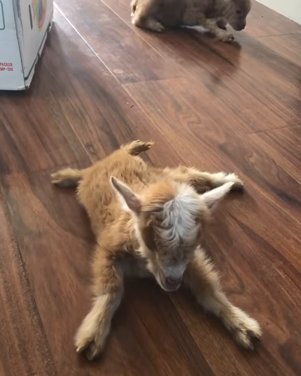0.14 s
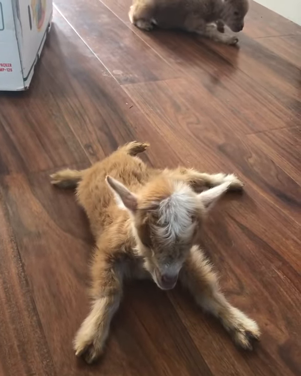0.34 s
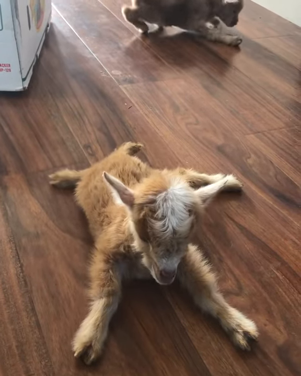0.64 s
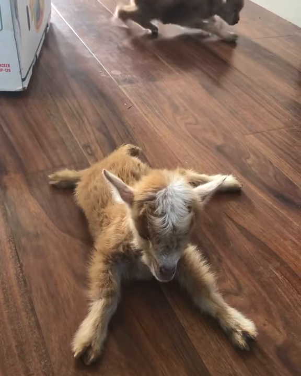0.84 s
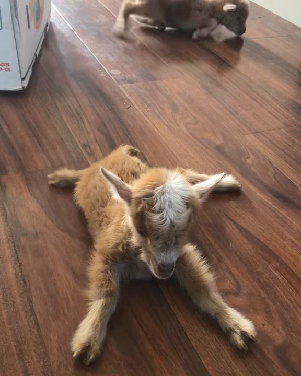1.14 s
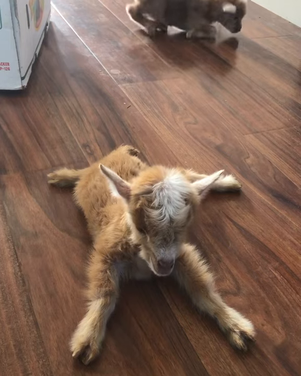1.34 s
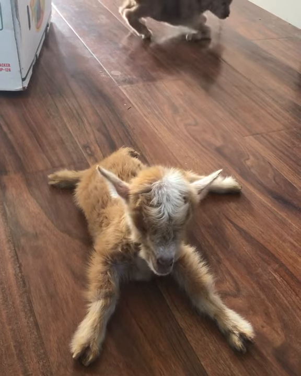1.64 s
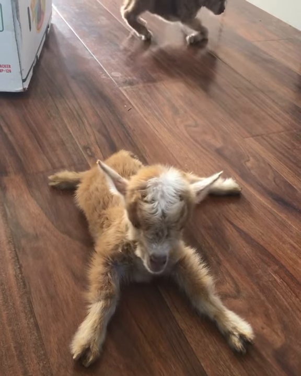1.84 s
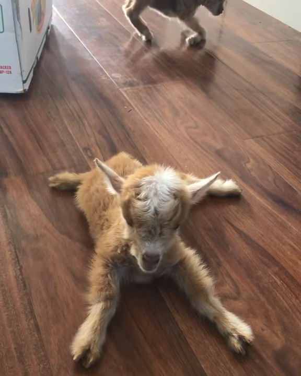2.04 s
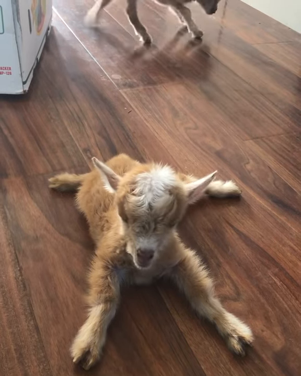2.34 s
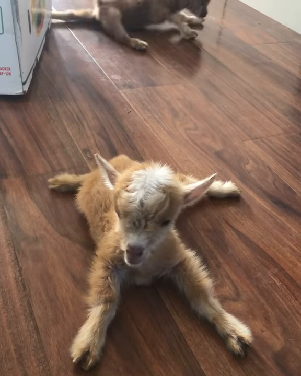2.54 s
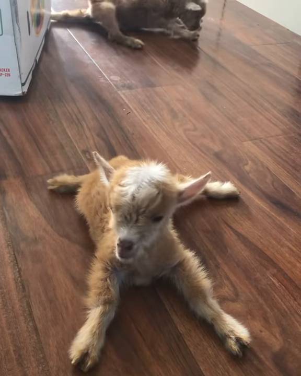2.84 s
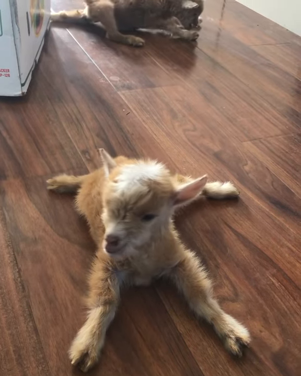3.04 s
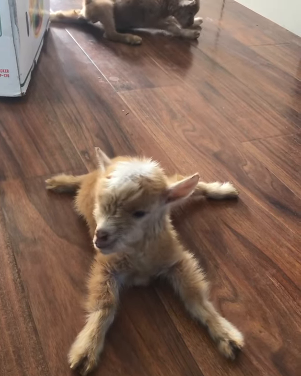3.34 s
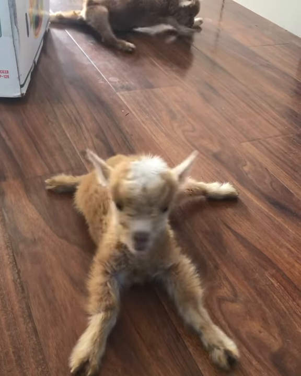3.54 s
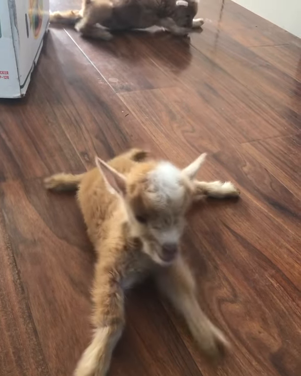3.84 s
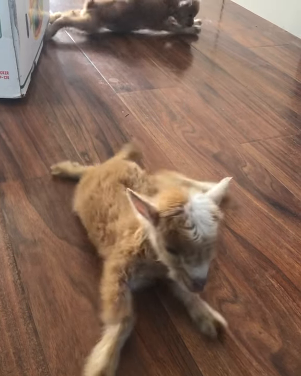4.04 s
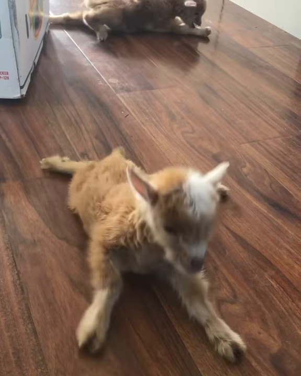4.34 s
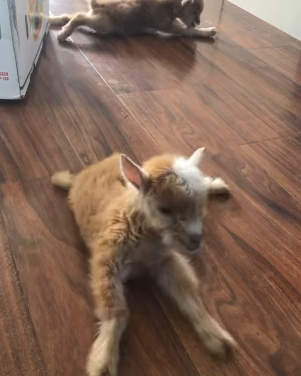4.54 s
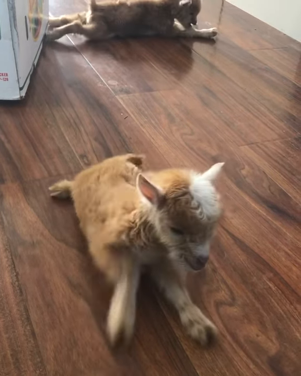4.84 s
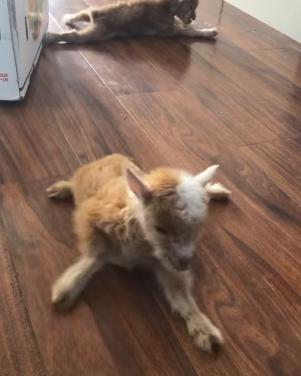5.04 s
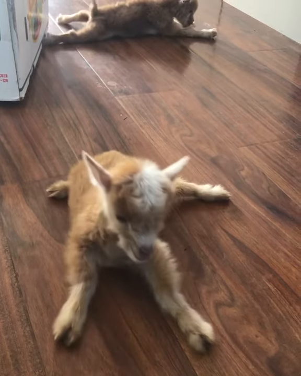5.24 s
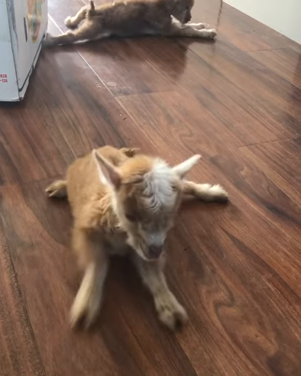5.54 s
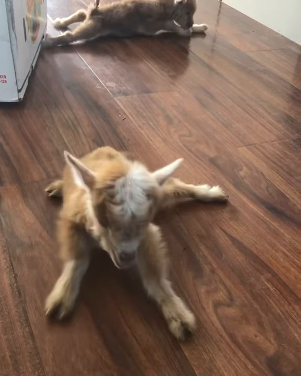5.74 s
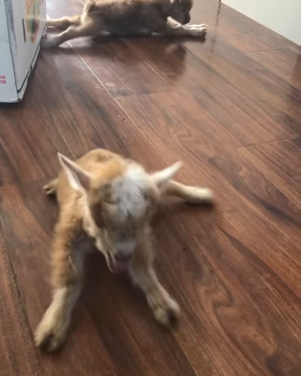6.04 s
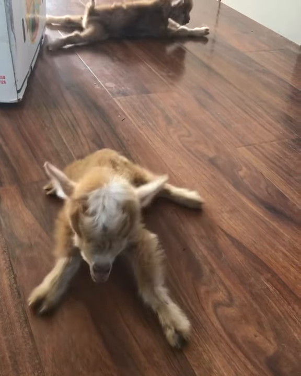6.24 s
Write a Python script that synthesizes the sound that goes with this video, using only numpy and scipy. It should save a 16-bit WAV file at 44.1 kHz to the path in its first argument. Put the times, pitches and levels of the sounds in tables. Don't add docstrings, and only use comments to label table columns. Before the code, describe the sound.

In a quiet, hard-walled room, a young goat slips with a thud, bleats four times across the floor, and a closer kid answers with a cracking squeak.

```python
import sys
import numpy as np
from scipy import signal
from scipy.fft import rfft, irfft, next_fast_len
from scipy.io import wavfile
from scipy.ndimage import uniform_filter1d

SR = 44100
rng = np.random.default_rng(int(sys.argv[2]) if len(sys.argv) > 2 else 0)


def materialize(psi):
    bounded = np.clip(np.atleast_2d(psi).T, -1, 1)
    quanta = np.round(bounded * 32767).astype(np.int16)
    wavfile.write(sys.argv[1], SR, quanta)


def amplitude_ratio(level_db):
    exponent = np.asarray(level_db, float) / 20
    return 10 ** exponent


N = 281358


def rms_one(x):
    return x / np.sqrt(np.mean(x ** 2) + 1e-20)


def at_hz(points, hz):
    point_hz, value = np.array(points).T
    return np.interp(np.log(hz), np.log(point_hz), value)


def band(x, low_hz, high_hz):
    edges_hz = [low_hz, min(high_hz, 0.45 * SR)]
    return signal.sosfilt(signal.butter(2, edges_hz, "band", fs=SR, output="sos"), x)


def drift(rate_hz, size):
    r = np.exp(-2 * np.pi * rate_hz / SR)
    white = rng.standard_normal(size + 4000)
    return rms_one(signal.lfilter([1], [1, -2 * r, r * r], white)[4000:])


def add(out, s, piece):
    i = round(s * SR)
    out[i:i + len(piece)] += piece[:N - i]


def house():
    # frequency in Hz, density in dB per Hz.
    hum_spectrum = [(26, -27), (45, -3.5), (123, -11.5), (157, 1.5), (319, -12), (449, -12.5), (533, -16),
                    (788, -22), (869, -21.5), (1950, -31), (2310, -35.5), (2880, -34), (8050, -44),
                    (12200, -46.5), (15600, -44)]
    # frequency in Hz, rms level in dB.
    whine = [(2013, -89), (2859, -87.5), (3435, -99), (3494, -90.5), (5685, -93.5), (11768, -92)]
    hum_db, high_whine_stops_s = -57, 3.5

    size = next_fast_len(N)
    hz = np.maximum(np.arange(size // 2 + 1) * SR / size, 1)
    hum = irfft(rfft(rng.standard_normal(size)) * amplitude_ratio(at_hz(hum_spectrum, hz)), size)[:N]
    out = amplitude_ratio(hum_db) * rms_one(hum)

    t = np.arange(N) / SR
    for tone_hz, level_db in whine:
        running = (tone_hz < 9000) | (t < high_whine_stops_s)
        waver = amplitude_ratio(level_db + 3 + 1.4 * drift(19, N))
        out += waver * np.sin(2 * np.pi * tone_hz * t) * running
    return out


def room(x):
    # frequency in Hz, time to fall 60 dB in seconds.
    room_t60 = [(100, 0.35), (500, 0.53), (1500, 0.53), (3000, 0.43), (6000, 0.44), (12000, 0.35)]
    t = np.arange(SR) / SR
    edges_hz = 60 * 2 ** np.arange(0, 8.5, 0.5)
    white = rng.standard_normal((2, SR))
    tail = np.zeros(SR)
    for k, (low, high) in enumerate(zip(edges_hz, edges_hz[1:])):
        t60 = at_hz(room_t60, np.sqrt(low * high))
        tail += band(white[k % 2], low, high) * amplitude_ratio(-60 * t / t60)
    tail *= np.clip((t - 0.004) / 0.0025, 0, 1)
    return signal.fftconvolve(x, tail / np.sqrt(np.sum(tail ** 2)))[:N]


def hoof_and_fur_slides():
    # start in seconds, length in seconds, scuff in dB, fur rustle in dB.
    strokes = [(0.002, .22, -80, -75.5), (.62, 0.095, -77, -80), (.8, 0.13, -72.5, -80),
               (0.898, 0.14, -69.5, -76), (1.038, 0.072, -65, -76), (1.095, 0.28, -71.5, -78),
               (1.368, .09, -81, -85), (1.53, 0.21, -82, -86), (2.14, .2, -75, -79),
               (2.3, 0.24, -70, -80.5), (2.546, .12, -76, -83), (2.678, .2, -82, -83),
               (3.29, .14, -77, -82), (3.412, .09, -77, -79), (3.5, 2.85, -82, -77.5),
               (3.89, .07, -68, -65), (3.997, 0.073, -62, -67), (4.616, .06, -74, -68),
               (4.67, 0.068, -76, -74), (5.12, 0.18, -70, -80), (5.33, 0.08, -78, -79),
               (5.42, .09, -74, -73), (5.56, 0.082, -76, -66), (6.22, 0.17, -71, -81)]
    scuff = np.full(N, amplitude_ratio(-87))
    fur = np.full(N, amplitude_ratio(-98))
    for s, length, scuff_db, fur_db in strokes:
        swell = np.hanning(round(length * SR)) ** 0.4
        add(scuff, s, amplitude_ratio(scuff_db) * swell)
        add(fur, s, amplitude_ratio(fur_db) * swell)
    grains = rng.standard_normal((2, N)) * amplitude_ratio(1.4 * drift(60, N))
    horn_noise = rms_one(band(grains[0], 1730, 5930))
    fur_noise = rms_one(band(grains[1], 8500, 17500))
    return scuff * horn_noise + fur * fur_noise


def noise_click(low_hz, high_hz, t60):
    t = np.arange(round(0.3 * SR)) / SR
    return rms_one(band(rng.standard_normal(len(t)), low_hz, high_hz)) * amplitude_ratio(-60 * t / t60)


def board_knocks():
    # start in seconds, peak in dB, board pitch in Hz, tick in dB, joists in dB.
    blows = [(0.979, -45.5, 169, -58, -65), (0.994, -43, 217, -67, -40.5), (1.062, -39, 120, -50.5, -45),
             (1.205, -43, 388, -73, -52), (1.299, -46.5, 169, -47.5, -72), (2.352, -44, 208, -51.5, -51),
             (2.566, -27.5, 124, -54, -37.5), (3.934, -46, 170, -66.5, -77), (3.986, -47.5, 630, -49, -70),
             (4.014, -41.5, 274, -60, -50), (4.383, -44.5, 150, -44, -73.5)]
    out = np.zeros(N)
    t = np.arange(round(0.3 * SR)) / SR
    for s, peak_db, hz, tick_db, joist_db in blows:
        t60 = 0.059 * (hz / 150) ** 0.29
        white = rng.standard_normal(len(t))
        sweep = 2 * np.pi * (hz * t + 3.46 * (1 - np.exp(-t / 0.0036)))
        ring = np.sin(sweep) * amplitude_ratio(-60 * t / t60) * (1 - np.exp(-t / 0.0014))
        rattle = rms_one(band(band(white, hz, 1260), 60, 1400)) * amplitude_ratio(-60 * t / (1.08 * t60))
        joists = rms_one(band(white[::-1], 75, 148)) * amplitude_ratio(-60 * t / 0.27)
        joists *= 1 - np.exp(-t / 0.0064)
        tick = rms_one(band(white, 3000, 6500)) * amplitude_ratio(-60 * t / 0.013)
        body = ring + 0.3 * rattle
        add(out, s, amplitude_ratio(peak_db - 1.5) * body + amplitude_ratio(tick_db - 3.5) * tick + amplitude_ratio(joist_db) * joists)
    return out


def hoof_ticks():
    # start in seconds, peak in dB, pitch in Hz.
    taps = [(0.1194, -64, 2810), (0.6494, -64, 3950), (0.874, -53, 4240), (0.9073, -60, 3330),
            (0.9557, -56, 4910), (1.1344, -58, 4590), (1.1767, -57, 4000), (2.353, -50, 3300),
            (2.47, -56.5, 2930), (3.9201, -46, 2780), (4.024, -55, 3960), (4.6436, -47, 5670),
            (5.725, -55, 2860), (6.325, -47, 2970)]
    out = np.zeros(N)
    for s, peak_db, hz in taps:
        add(out, s, amplitude_ratio(peak_db - 5) * noise_click(0.91 * hz, 1.15 * hz, t60=0.034))
    return out


def dry_snaps():
    # start in seconds, peak in dB.
    snaps = [
        (3.447, -60),
        (4.683, -57),
        (5.399, -51.5),
        (5.437, -57),
    ]
    out = np.zeros(N)
    for s, peak_db in snaps:
        add(out, s, amplitude_ratio(peak_db) * noise_click(2900, 16500, t60=0.027))
    return out


def puffs(table, nose, mouth):
    out = np.zeros(N)
    for s, length, level_db in table:
        white = rng.standard_normal(round(0.25 * SR))[:round(length * SR)]
        puff = band(white, 1900, 4400)
        puff += nose * band(white, 4340, 5900)
        puff += mouth * band(white, 9100, 16600)
        add(out, s, amplitude_ratio(level_db) * rms_one(puff) * np.hanning(len(puff)))
    return out


def bleat(tables, throat, mouth_sets, push, jitter, breath_db, fade_s):
    out = np.zeros(N)
    number = np.arange(1, 27)[:, None]
    no_lift_db, lift_per_db = push

    def soft(v):
        return uniform_filter1d(v, size=353, mode="nearest")

    for rows in tables:
        s, *columns = np.transpose(rows)
        t = np.arange(s[0], s[-1], 1 / SR)

        def wander(rate_hz):
            return drift(rate_hz, size=24000)[:len(t)]

        pitch, effort_db, mouth, tongue_hz = [soft(np.interp(t, s, c)) for c in columns]
        tilt, depth, nose_db = [shut + mouth * (wide - shut) for shut, wide in mouth_sets.values()]
        pitch = pitch * (1 + jitter * wander(28))
        phase = 2 * np.pi * np.cumsum(pitch) / SR
        hz = number * pitch

        gains = amplitude_ratio(depth * at_hz(throat, hz) + tilt * np.log2(hz / 2800)) * (hz < 17000)
        lift_db = lift_per_db * (effort_db - no_lift_db)
        gains *= amplitude_ratio(lift_db * np.exp(-(np.log2(hz / 2860) / 0.32) ** 2))
        gains *= amplitude_ratio(7 * np.exp(-(np.log2(hz / tongue_hz) / 0.11) ** 2))
        head = np.clip((pitch - 1750) / (2330 - 1750), 0, 1)
        gains *= amplitude_ratio(-11 * head * (number % 2 == 0))
        gains *= amplitude_ratio(-5 * np.clip(1.19 - mouth, 0, 1) * np.clip(number - 10, 0, 5))
        gains *= amplitude_ratio(1.37 * number ** 0.34 * np.array([wander(27) for _ in hz]))
        upper = np.sqrt(np.sum(gains[1:] ** 2, axis=0))
        gains[0] = np.hypot(gains[0], amplitude_ratio(nose_db) * upper)
        gains /= np.sqrt(np.sum(gains ** 2, axis=0) / 2)

        lag = rng.normal(0, 0.49, (26, 1))
        tone = np.sum(gains * np.sin(number * phase + lag), axis=0)
        air = tone * wander(167)
        edge = np.clip(np.minimum(t - s[0], s[-1] - t) / fade_s, 0, 1)
        add(out, s[0], edge * amplitude_ratio(effort_db) * (tone + amplitude_ratio(breath_db) * air))
    return out


def near_kid():
    # frequency in Hz, gain in dB.
    throat = [(1200, -51.5), (2000, -0.5), (2700, -1), (4000, -18.5), (5300, -10.5), (6600, -11),
              (7900, -12.5), (9300, -14.5), (12000, -19.5), (15500, -34)]
    # tilt in dB per octave, throat depth, nasal hum in dB relative to the upper harmonics.
    mouth_sets = dict(tilt_db=(-16.5, -0.13), depth=(1, 0.94), nose_db=(26.5, -61))
    push = (-40, 0.028)
    # time in seconds, pitch in Hz, effort in dB, mouth opening (0 shut, 1 wide),
    # tongue resonance in Hz.
    creak = [(5.556, 1475, -56, 0.4, 2900), (5.566, 1272, -59.5, 0.28, 7700),
             (5.588, 1465, -52.5, 0.22, 10100), (5.605, 1486, -50, .33, 10600),
             (5.613, 1570, -49, .4, 9400)]
    whistle = [(5.614, 1680, -48, 0.37, 8600), (5.641, 2140, -49, 1, 8650), (5.656, 2350, -52, 0.9, 7100),
               (5.672, 2150, -62, 0.87, 8600), (5.709, 1877, -54, 0.54, 7600),
               (5.732, 1960, -47, 0.95, 7800)]
    chirp = [(5.734, 1670, -47, 0.57, 7560), (5.742, 1440, -38.5, 0.47, 7300),
             (5.755, 1445, -42.5, 0.61, 7200), (5.779, 1550, -42, 0.7, 7700)]
    flip = [(5.78, 2410, -39.5, 1.24, 7300), (5.793, 2628, -35.5, 1.06, 7700),
            (5.812, 1860, -54.5, 1.08, 7500), (5.832, 2054, -40, 1.3, 7800)]
    squeak = [(5.835, 1616, -42, 0.72, 6150), (5.853, 1472, -32.5, 0.66, 5740),
              (5.877, 1447, -36, 0.77, 5800), (5.895, 1495, -34.5, 0.61, 5740),
              (5.926, 1427, -30.5, 0.86, 5600), (5.96, 1317, -25.5, 0.77, 9100),
              (6.03, 1300, -26, 0.93, 8100), (6.132, 1349, -28.5, 0.8, 7700), (6.156, 1690, -45.5, 1, 7900)]
    # start in seconds, length in seconds, level in dB.
    snorts = [
        (5.812, 0.044, -47.5),
        (6.138, 0.017, -40.5),
        (6.178, 0.068, -50),
        (2.9, 0.044, -58),
        (5.74, 0.071, -54),
        (0.952, 0.03, -66),
    ]
    voice = bleat([creak, whistle, chirp, flip, squeak], throat, mouth_sets, push,
                  jitter=0.004, breath_db=-42, fade_s=0.00088)
    return voice + puffs(snorts, nose=0.4, mouth=0.3)


def far_kid():
    # frequency in Hz, gain in dB.
    throat = [(600, -15), (1000, -14), (1900, -9.5), (2800, 0.5), (3800, -9.5), (4700, -7), (5600, -5),
              (6700, -9.5), (7800, -9), (9600, -13), (12000, -21), (15500, -25)]
    # tilt in dB per octave, throat depth, nasal hum in dB relative to the upper harmonics.
    mouth_sets = dict(tilt_db=(-18.5, 2.33), depth=(1.7, 1.11), nose_db=(-7, -21))
    push = (-32.5, 0.68)
    # time in seconds, pitch in Hz, effort in dB, mouth opening (0 shut, 1 wide),
    # tongue resonance in Hz.
    whimper = [(2.74, 747, -57.5, .2, 1550), (2.76, 746, -58, .1, 1550), (2.796, 828.5, -47.5, 0.017, 1650),
               (2.828, 813, -48.5, 0.068, 1660), (2.844, 815, -49.5, 0.45, 4630),
               (2.86, 825, -67, .2, 4500)]
    first = [(2.865, 993, -44.5, .02, 1000), (2.9, 947, -43.5, .02, 1000),
             (2.916, 959.5, -34.5, 0.76, 7750), (2.943, 1000, -31.5, 1.05, 8100),
             (2.964, 979, -30, 1.03, 8200), (3.001, 972, -32, 0.92, 8050),
             (3.035, 977.5, -33.5, 0.97, 8000), (3.065, 963, -33, 1.17, 7900), (3.09, 955, -50, 1.6, 7700)]
    gulp = [(3.46, 1006, -57, .02, 1000), (3.486, 955, -55.5, .1, 1900), (3.505, 755, -51, .2, 1550)]
    second = [(3.518, 852, -62, 0.16, 1800), (3.531, 912, -43.5, 0.52, 3700),
              (3.55, 961, -32.5, 0.89, 5700), (3.576, 942.4, -30, 0.98, 5700),
              (3.61, 960.5, -27.5, 0.96, 5750), (3.68, 970, -33.5, 0.92, 5800),
              (3.738, 948, -31, 0.79, 5700), (3.766, 759, -41.5, 0.76, 5300), (3.78, 755, -49, 0.67, 5300)]
    third = [(4.04, 725, -51, 0.39, 2950), (4.071, 746, -50, 0.32, 2950), (4.101, 932.5, -33.5, 1.05, 4200),
             (4.201, 957.5, -27, 1, 5000), (4.286, 956.4, -22, 0.99, 5700),
             (4.376, 959.8, -27, 1.045, 5750), (4.426, 942, -30, 0.96, 5700), (4.491, 936, -31, 0.88, 5600),
             (4.525, 681, -38.5, 0.74, 5400)]
    fourth = [(4.79, 606, -54, 0.63, 2520), (4.814, 680, -50, 0.71, 2040), (4.842, 730, -41, 0.85, 5400),
              (4.862, 872, -27.5, 0.97, 5540), (4.884, 927.3, -29.5, 0.94, 5500),
              (4.914, 890.5, -33, 0.97, 5400), (4.935, 794, -40.5, 0.69, 5340)]
    # start in seconds, length in seconds, level in dB.
    rasps = [
        (2.893, 0.041, -65),
        (3.07, 0.082, -57),
        (3.47, 0.051, -72.5),
        (3.522, 0.041, -57),
        (3.75, 0.06, -57),
        (4.495, 0.032, -45),
        (4.9, 0.057, -48),
        (5.19, 0.086, -62.5),
    ]
    voice = bleat([whimper, first, gulp, second, third, fourth], throat, mouth_sets, push,
                  jitter=0.004, breath_db=-46, fade_s=0.0061)
    return amplitude_ratio(-5.5) * voice + puffs(rasps, nose=0.77, mouth=0.23)


def scene():
    far = far_kid()
    near = near_kid()
    boards = board_knocks() + hoof_ticks() + dry_snaps()
    thin = far - 0.6 * band(far, 580, 1360)
    wet = room(amplitude_ratio(-0.5) * thin + amplitude_ratio(-12.5) * near + amplitude_ratio(-6.5) * boards)
    mono = far + near + boards + wet + hoof_and_fur_slides() + house()
    return np.tile(mono, (2, 1))


def band_limit(x):
    return signal.sosfilt(signal.butter(12, 15730, fs=SR, output="sos"), x)


def record(dry):
    cut = signal.sosfilt(signal.butter(8, 45, "high", fs=SR, output="sos"), dry)
    cut = signal.sosfilt(signal.cheby2(14, 60, 16200, fs=SR, output="sos"), cut)
    return band_limit(cut)


dry = scene()
out = record(dry)
materialize(out)
```